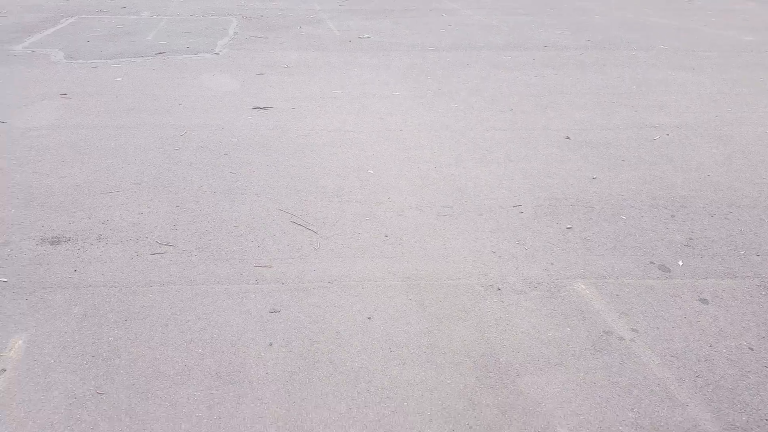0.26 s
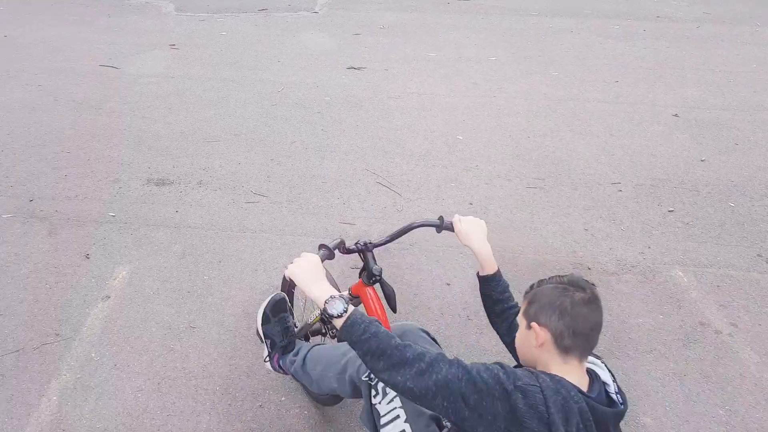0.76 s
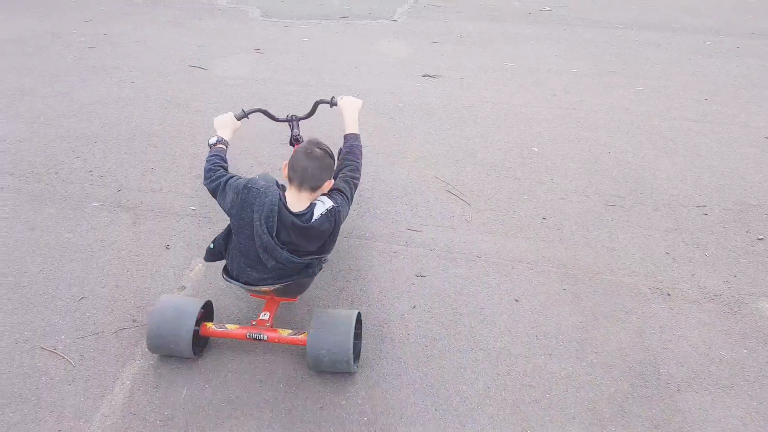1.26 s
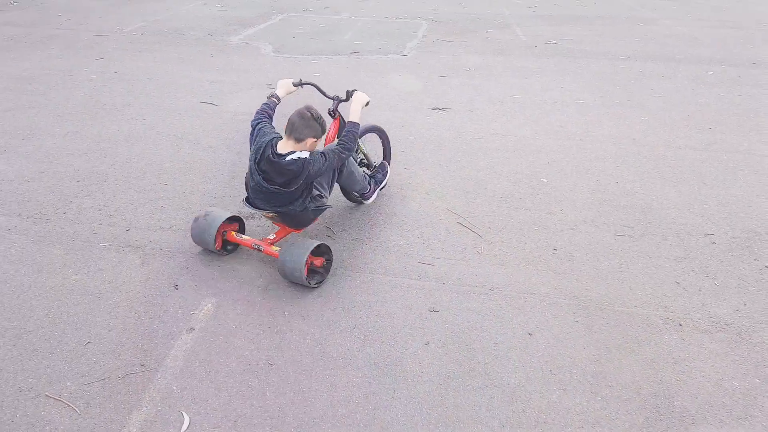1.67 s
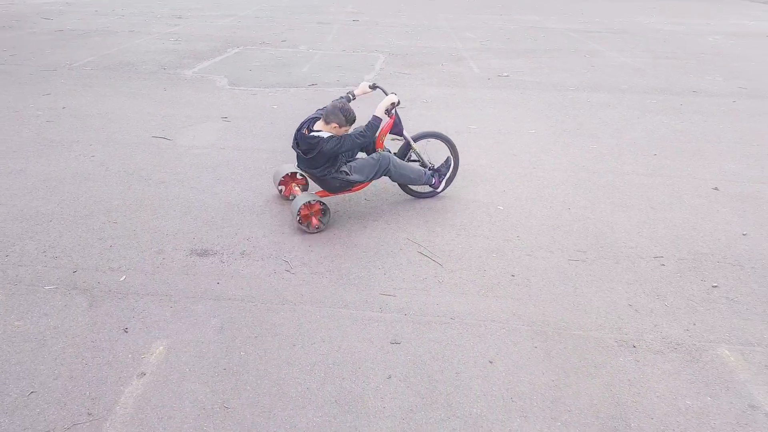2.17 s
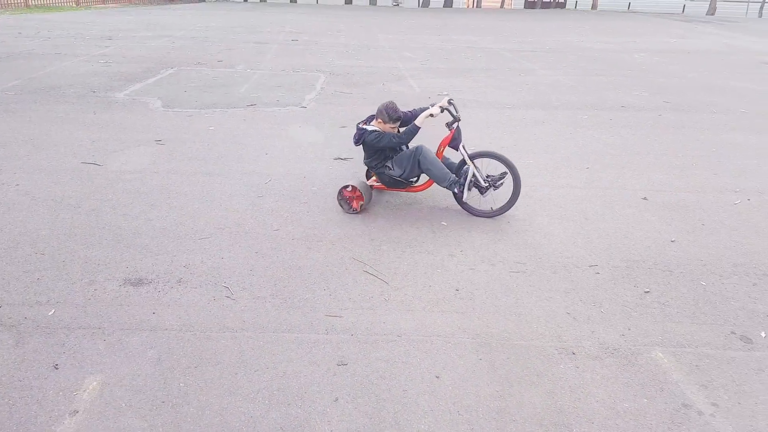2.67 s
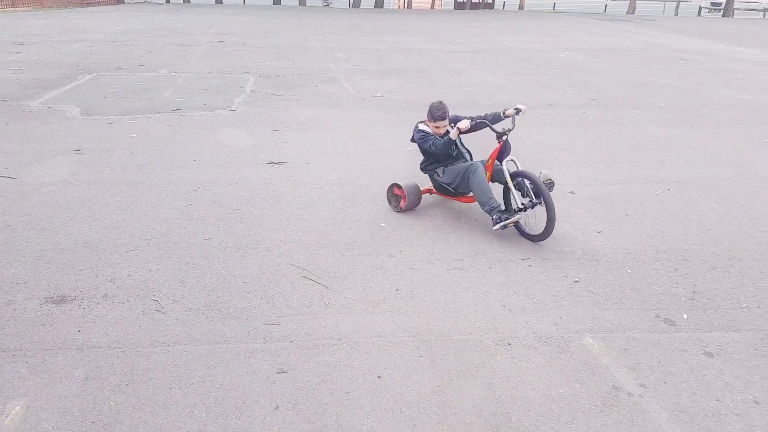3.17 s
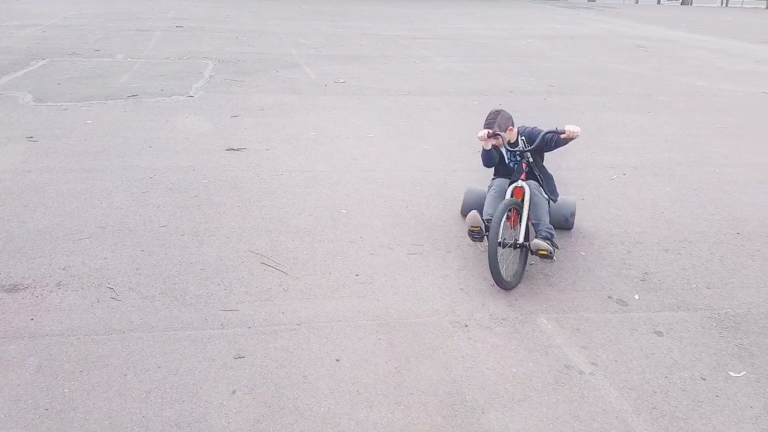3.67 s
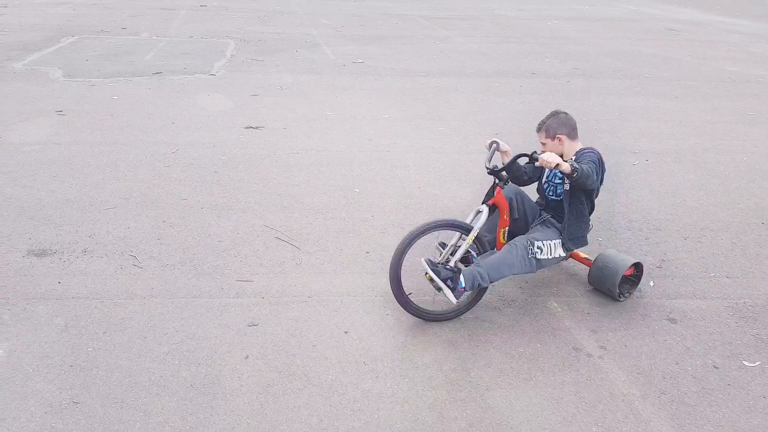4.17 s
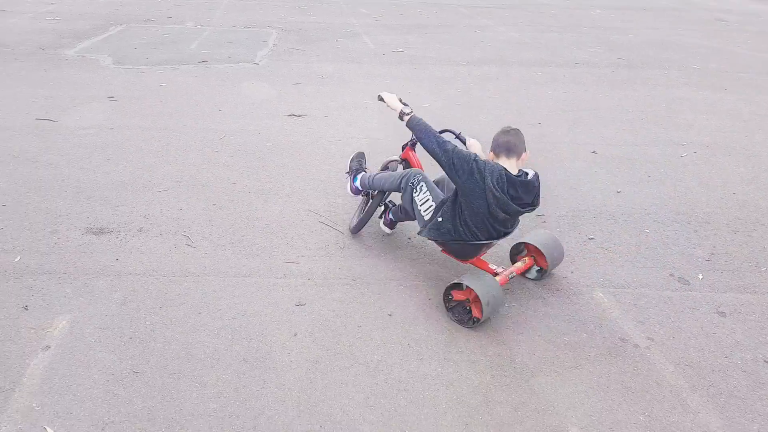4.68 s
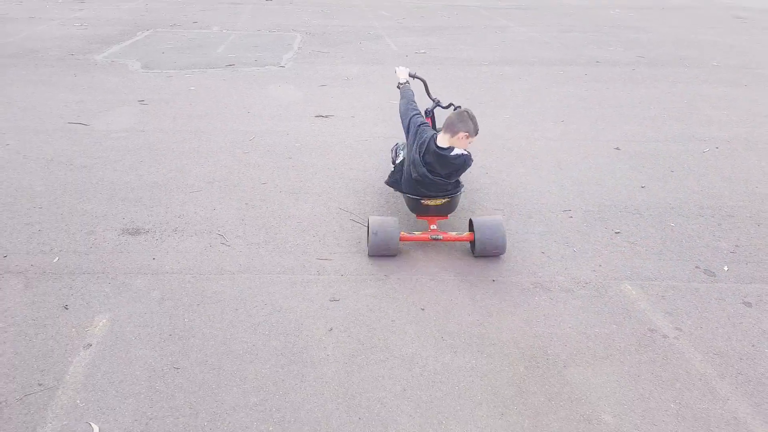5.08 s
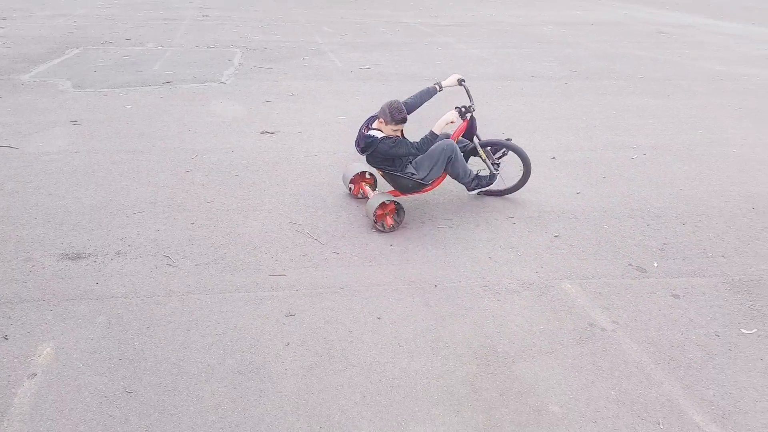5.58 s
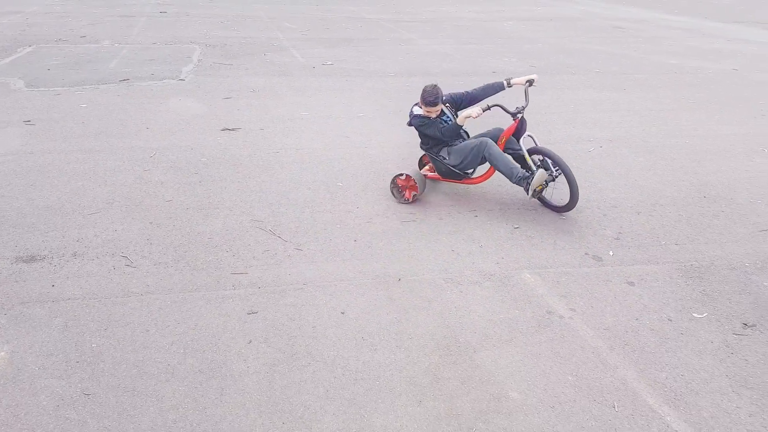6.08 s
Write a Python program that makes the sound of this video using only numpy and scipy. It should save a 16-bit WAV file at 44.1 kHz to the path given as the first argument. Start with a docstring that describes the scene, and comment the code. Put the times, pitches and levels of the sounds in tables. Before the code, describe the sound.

Close gritty grinding and sharp stone cracks on asphalt open into a hollow, ringing plastic scrape that swells and dips as a trike slides around.

```python
"""Stones crack over a close grind, then the scrape rings out: a drift trike passes and circles a car park.
Hollow plastic rear wheels grind on asphalt: shared grain impacts drive the resonances of frame, cavity,
rim and sleeve and the grit and dust bands; short bites make the grinding surge.
Stones and chippings are brief bursts of coloured noise. Heading and distance set each part's level,
an early reflection combs the sound, and low air noise rumbles separately on two microphone ports."""
import sys
import numpy as np
from scipy import signal
from scipy.fft import rfft, irfft, next_fast_len
from scipy.io import wavfile
from scipy.ndimage import uniform_filter1d, map_coordinates

SR = 44100
rng = np.random.default_rng(int(sys.argv[2]) if len(sys.argv) > 2 else 0)


def dump(signal):
    """Clip the signal to [-1, 1] and save it as 16-bit WAV at the path in sys.argv[1]."""
    limited = np.clip(np.atleast_2d(signal).T, -1, 1)
    pcm = np.round(limited * 32767).astype(np.int16)
    wavfile.write(sys.argv[1], SR, pcm)


N = 279153
TIME_S = np.arange(N) / SR

# air on the ports before its wobble: t/s, level/dB
AIR_DB = [(0, -48), (1.3, -57.5), (2.2, -52.5), (3.0, -53.5), (3.7, -46), (4.3, -51), (4.6, -35.5),
          (5.0, -42.5), (5.5, -35), (5.7, -49), (5.92, -39.5), (6.33, -53.5)]
# colour of the air rumble: f/Hz, level/dB
RUMBLE_DB = [(15, -43), (55, -3.5), (95, 0.5), (150, -1), (190, -7), (260, -7), (550, -17.5), (2000, -64)]

# course of the trike: t/s, distance/m, heading/deg (0 tail to the microphone, 90 side-on, 180 nose to it)
PATH_M_DEG = [(0, 1.64, -160), (0.6, 1.53, -91.5), (1.0, 2.66, 4), (1.5, 3, 31), (2.0, 4, 61),
              (2.65, 7.1, 119), (3.2, 3.35, 109), (3.7, 5.1, 168), (4.25, 2.6, 217), (4.6, 3.65, 251),
              (5.23, 2, 350), (5.65, 5.1, 450), (6.0, 4.9, 457), (6.33, 4.9, 498)]
# bearing: t/s, lead of the left port/ms
BEARING_MS = [(0, -0.42), (.45, -0.28), (.75, -0.12), (1.05, 0.081), (1.4, 0.12), (1.95, 0.11),
              (3.15, -0.034), (4.35, -0.17), (4.95, -0.058), (5.6, 0.00091), (6.33, 0.0021)]
# early reflection: t/s, delay/ms
ECHO_MS = [(0, 0.79), (0.55, 0.47), (1.1, 0.51), (1.65, 0.59), (1.88, 0.85), (2.15, 0.91), (2.55, 1.02),
           (3.35, 0.98), (3.75, 0.94), (4.1, 0.844), (4.65, 0.79), (5.15, 0.89), (5.85, 1.05), (6.33, 0.96)]

# larger stones caught under a wheel; levels before the common stone trim:
# t/s, level/dB, centre f/Hz, spread/octaves (before SPREAD_SCALE), contact time/s
STONES = [(0.0217, -17, 2280, 0.22, 0.0002), (0.0343, -13, 3200, 0.88, 0.00071),
          (0.059, -17.5, 3680, 0.5, 0.0015), (0.069, -14, 1510, 0.39, 0.0023),
          (0.101, -16.5, 3240, 0.51, 0.0015), (0.1515, -11.5, 2630, 0.7, 0.0011),
          (0.158, -17, 2750, 0.71, 0.0028), (0.1815, -11.5, 2720, 0.16, 0.00032),
          (0.2386, -12, 2760, 0.39, 0.00056), (0.2507, -12, 2620, 0.18, 0.0014),
          (0.3082, -12.5, 2370, 0.63, 0.0039), (0.42, -12.5, 2870, 0.31, 0.00052),
          (0.4811, -10.5, 2200, 0.72, 0.0042), (0.6173, -12.5, 3900, 0.25, 0.001),
          (0.6693, -11, 2770, 0.43, 0.00079), (0.6958, -11.5, 1940, 1.04, 0.0023),
          (0.7277, -9.5, 2200, 0.3, 0.0016), (0.9368, -13, 2390, 0.14, 0.00088),
          (0.9617, -14, 3080, 0.88, 0.0018), (0.9949, -10.5, 2800, 0.26, 0.0015),
          (1.1183, -12.5, 2400, 0.61, 0.0013), (1.3285, -20, 2720, 1.0, 0.0011),
          (1.473, -18, 2140, 0.73, 0.0015), (1.669, -14.5, 3500, 0.67, 0.0016),
          (1.7503, -9, 3220, 0.43, 0.00088), (1.901, -14, 3270, 0.5, 0.0011),
          (1.9671, -14, 1780, 0.46, 0.0036), (2.3612, -9, 2800, 0.35, 0.0031),
          (2.3939, -15.5, 1420, 0.6, 0.0013), (2.484, -13.5, 2590, 0.36, 0.0007),
          (2.5166, -13, 4800, 0.7, 0.00074), (2.6006, -16.5, 3060, 0.88, 0.0017),
          (2.6608, -13, 3000, 0.65, 0.001), (2.7497, -9, 6600, 0.99, 0.00095),
          (2.7989, -19, 3070, 0.39, 0.00088), (2.831, -14.5, 4040, 0.46, 0.00044),
          (3.067, -11, 1820, 0.7, 0.0012), (3.1437, -14, 1840, 0.75, 0.0018),
          (3.3438, -15.5, 3420, 0.51, 0.002), (3.45, -14, 2600, 0.52, 0.00093),
          (3.599, -10, 2340, 0.43, 0.0014), (3.8734, -12.5, 2780, 0.29, 0.00053),
          (3.9077, -14, 4560, 0.46, 0.003), (4.2195, -11, 2870, 0.48, 0.0049),
          (4.254, -15.5, 4700, 0.33, 0.0014), (4.3882, -8, 2140, 0.55, 0.0026),
          (4.5178, -12, 4250, 0.56, 0.0008), (4.7686, -16, 2200, 0.13, 0.0024),
          (4.7804, -15, 3240, 1.1, 0.0022), (4.843, -13, 2730, 0.77, 0.0007),
          (4.8798, -4.5, 1930, 0.21, 0.00078), (5.1256, -7.5, 2800, 0.45, 0.00046),
          (5.1538, -13, 3200, 0.86, 0.0014), (5.1697, -9, 1510, 0.78, 0.00049),
          (5.2223, -12, 1880, 0.47, 0.002), (5.278, -15, 1930, 0.5, 0.0011),
          (5.3437, -9, 2540, 0.49, 0.00056), (5.4936, -17, 2240, 0.21, 0.0013),
          (5.5743, -20.5, 2030, 0.76, 0.0025), (5.6119, -11, 2580, 0.7, 0.00074),
          (5.7893, -14.5, 5200, 0.86, 0.00071), (5.8086, -14.5, 4340, 0.97, 0.0014),
          (5.9267, -14.5, 2720, 0.51, 0.0025), (5.9763, -11, 2230, 0.42, 0.0015),
          (6.1182, -14, 2840, 0.49, 0.0011), (6.2138, -17.5, 2200, 0.59, 0.0013)]
# colour common to all stones: f/Hz, level/dB
STONE_COLOUR_DB = [(100, -11), (380, 20.5), (580, 2), (1100, 15.5), (1600, 4), (2100, 6), (3000, 0.5),
                   (5000, 4), (6000, 2.5), (7600, 6.5), (9200, -3.5), (11000, 0.5), (16000, -6)]

# steady grinding: t/s, level/dB
GRIND_DB = [(0.0, -29), (0.23, -27.5), (0.42, -22), (0.62, -18.5), (0.87, -27.5), (1.05, -27), (1.25, -27),
            (1.6, -29.5), (1.85, -20), (2.2, -25), (2.58, -23), (2.98, -28.5), (3.3, -26), (3.72, -26),
            (4.0, -25), (4.35, -28.5), (4.72, -26), (5.07, -29), (5.3, -24), (5.75, -27.5), (6.1, -31),
            (6.33, -27.5)]
# wheels bite into the asphalt: middle t/s, length at half the dB gain/s, gain/dB
BITES = [(0.474, 0.092, 4), (0.77, 0.047, 7.5), (0.952, 0.063, 9.5), (1.001, 0.028, 4.5),
         (1.084, 0.064, 5.5), (1.37, 0.055, 7.5), (1.692, 0.064, 7), (1.85, 0.036, 2), (1.97, 0.08, 1.5),
         (2.353, 0.082, 5), (2.678, 0.035, 4), (2.831, 0.026, 6), (3.07, 0.039, 7), (3.154, 0.054, 8.5),
         (3.592, 0.13, 4.5), (3.726, 0.11, 5), (3.915, 0.072, 6), (4.042, 0.036, 4), (4.282, 0.054, 5.5),
         (4.422, 0.038, 10.5), (4.542, 0.087, 9), (4.643, 0.05, 6), (4.763, 0.076, 7), (4.865, 0.11, 5.5),
         (4.988, 0.057, 6), (5.183, 0.053, 2), (5.27, 0.042, 2.5), (5.32, 0.018, 2.5), (5.39, 0.048, 8),
         (5.58, 0.017, 6.5), (5.876, 0.021, 7), (5.97, 0.076, 4), (6.25, 0.035, 2)]
# how the skid loads the sleeves: t/s, shift of their resonances/Hz, ring of their edge/dB
SKID_HZ_DB = [(0, 450, -36), (0.55, 250, -5.5), (0.8, 60, -6), (1.05, 150, -7), (1.35, -130, -7.5),
              (1.9, -130, -8), (2.4, -0.5, -13.5), (3.3, 20, -15.5), (3.7, 90, -8.5), (4.3, 70, -14.5),
              (4.8, 171, -19), (5.2, 11.5, -14.5), (6.33, 10.5, -18)]

# resonances of the frame: f/Hz, width/Hz, level/dB
FRAME_MODES = [(340, 296, -6.5), (431.6, 94, 0), (488.5, 43, -2), (710, 260, -7.5)]
# resonances of the hollow wheel: f/Hz, width/Hz, level/dB
CAVITY_MODES = [(780, 230, -11), (1098, 67, 0), (1285, 210, -8)]
# resonance of the rim: f/Hz, width/Hz, level/dB
RIM_MODES = [(1507, 135, 0)]
# resonances of the sleeves before the skid shift: f/Hz, width/Hz, level/dB
SLEEVE_MODES = [(1790, 280, -1.5), (2030, 303, 0), (2208, 168, -0.5), (3070, 156, -11)]
# resonance of the sleeve edge: f/Hz, width/Hz, level/dB
EDGE_MODES = [(3090, 960, 0)]
# colour of the grit: f/Hz, level/dB
GRIT_DB = [(150, -29), (550, -14), (900, 2), (1600, -1), (2600, 4.5), (3200, -1), (4000, -1.5), (5000, -1),
           (5900, -10.5), (7300, -25), (8200, -44.5), (9200, -30), (16000, -41)]
# colour of the dust: f/Hz, level/dB
DUST_DB = [(4000, -3), (6000, 3.5), (7300, 6), (8200, 4), (9200, -9), (10500, -3), (11300, -4.5),
           (12100, -0.5), (12900, -1), (13800, 0), (16000, -3.5)]

# radiation of each part: tail-on at REFERENCE_M/dB, more side-on/dB, more behind the rider/dB,
# more towards the right flank/dB, change per doubling of distance/dB
FRAME_BEAM_DB = (-12.5, -4, 0, 0.8, -6)
# hollow wheel, same columns
CAVITY_BEAM_DB = (-7.5, -6, 2, 0.55, -3.05)
# rim, same columns
RIM_BEAM_DB = (-13.5, 0, -5.5, -2.5, -3)
# sleeves, same columns
SLEEVE_BEAM_DB = (-4.5, -0.6, 3, -1.1, -0.6)
# grit, same columns
GRIT_BEAM_DB = (-9, 3, 1, 0, -1.3)
# dust, same columns
DUST_BEAM_DB = (-16, 2, -4.5, 0.7, 1.5)

# likeness of the two ports: f/Hz, correlation/1
PORT_LIKENESS = [(300, 0.99), (1100, 0.84), (2100, 0.68), (4000, 0.51), (8000, 0.3), (14000, 0.27)]
# port balance: f/Hz, left minus right/dB
BALANCE_DB = [(100, -3), (450, 0.8), (800, 2), (1500, 4.5), (2000, 4), (2750, 6.5), (4500, 3.5),
              (7200, 5.5), (9200, -2.5), (12000, 9), (16000, 4.5)]

REFERENCE_M = 3
SHADOW_NARROWNESS = 7  # higher: the rider hides the wheels only when facing the microphone squarely
ECHO_FALL = 0.17  # power of distance by which the reflection fades
BITE_STEEPNESS = 3.06  # abruptness of a bite's start and end
SKID_START_S, SKID_ONSET_S, ROLLING_DB = 0.67, 0.17, -7.5  # sleeves ring less until the wheels break loose
FRAME_JOLT = 0.18  # extra frame dB per dB of surge
PATCHY_DB = 1.5  # standard deviation of the scrape's colour shifts
SPREAD_SCALE, MIN_CONTACT_S, STONE_TRIM_DB = 0.98, 0.0002, -1.5
PEAK, TOP_HZ = 0.95, 16000


def amp(db):
    """Decibels to gain."""
    return 10 ** (np.asarray(db) / 20)


def unit(x):
    """Scale to rms 1."""
    return x / np.sqrt(np.mean(x ** 2) + 1e-20)


def steady(x):
    """Scale to rms 1 over a running half second."""
    power = uniform_filter1d(np.mean(x ** 2, axis=0), size=SR // 2)
    return x / np.sqrt(np.abs(power) + 1e-20)


def along(points, hz):
    """Read (Hz, value) points on a log frequency axis."""
    f, v = np.transpose(points)
    return np.interp(np.log(hz + 1), np.log(f + 1), v)


def curves(rows):
    """One value per sample for each column after the time."""
    s, *cols = np.transpose(rows)
    return [np.interp(TIME_S, s, c) for c in cols]


def wobble(rate_hz):
    """Smooth random curve with rate_hz knots a second."""
    knots = rng.standard_normal(4096)
    smooth = signal.resample_poly(knots, 8, 1)
    return smooth[(TIME_S * rate_hz * 8).astype(int) % len(smooth)]


def filtered(x, response):
    """Multiply the spectrum by a response of frequency."""
    n = x.shape[-1]
    m = next_fast_len(n)
    hz = np.fft.rfftfreq(m, 1 / SR)
    return irfft(rfft(x, m) * response(hz), m)[..., :n]


def port_noise():
    """White noise at two ports: alike in the bass, far less so in the treble."""
    m = next_fast_len(N + 4096)  # spare length for the last stones
    hz = np.fft.rfftfreq(m, 1 / SR)
    alike = along(PORT_LIKENESS, hz)
    spectra = rng.standard_normal((2, 2 * len(hz))).view(complex)
    mid, side = spectra * np.sqrt([1 + alike, 1 - alike])
    return unit(irfft(np.array([mid + side, mid - side]), m))


def air():
    """Low rumble from unrelated noise at each port."""
    rumble = filtered(rng.standard_normal((2, N)), lambda hz: amp(along(RUMBLE_DB, hz)))
    return amp(curves(AIR_DB)[0] + 1.9 * wobble(33)) * unit(rumble)


def aspect():
    """View of the trike from the microphone, one row per column of a beam."""
    distance_m, heading_deg = curves(PATH_M_DEG)
    turn = np.radians(heading_deg)
    side_on = np.sin(turn) ** 2
    hidden = np.abs(np.sin(turn / 2)) ** (2 * SHADOW_NARROWNESS)
    doublings = np.log2(distance_m / REFERENCE_M)
    return np.array([np.ones(N), side_on, hidden, np.sin(turn), doublings])


def delayed(x, samples):
    """One channel read a moving number of samples late."""
    return map_coordinates(x, [np.arange(N) - samples], order=3)


def placed(x):
    """The sound reaches the nearer port first: half the lead goes to each port."""
    half_lead = curves(BEARING_MS)[0] / 1000 * SR / 2
    return np.array([delayed(x[0], -half_lead), delayed(x[1], half_lead)])


def reflected(x, share):
    """A late copy combs the sound; its notches glide with delay and fade with distance."""
    echo_time_s = TIME_S - curves(ECHO_MS)[0] / 1000
    late = np.array([np.interp(echo_time_s, TIME_S, port) for port in x])
    gain = share * (REFERENCE_M / curves(PATH_M_DEG)[0]) ** ECHO_FALL
    return (x + gain * late) / np.sqrt(1 + gain ** 2)


def surge():
    """Gain of the bites in dB, each a rounded swell."""
    total_db = np.zeros(N)
    for middle_s, length_s, gain_db in BITES:
        offset = np.abs(2 * (TIME_S - middle_s) / length_s)
        total_db += gain_db / (1 + offset ** BITE_STEEPNESS)
    return total_db


def effort():
    """Grinding level in dB: steady scrape plus surges."""
    return curves(GRIND_DB)[0] + surge()


def crunches(rows):
    """Each stone is a noise burst of its own pitch and contact time, with a short shiver in the wheel."""
    size, lead = 2048, 128  # samples; the lead leaves silence before contact
    t = np.maximum(np.arange(size) - lead, 0) / SR
    noise = port_noise()
    out = np.zeros_like(noise)
    for s, db, pitch_hz, spread, contact_s in rows:
        start = round(s * SR)
        span = slice(start, start + size)
        u = t / max(contact_s, MIN_CONTACT_S)
        shiver = amp(-60 * t / 0.032) * (1 - np.exp(-u))  # falls 60 dB in 32 ms
        jerks_db = 2.5 * np.repeat(rng.standard_normal(size // 16), 16)  # it breaks in tiny jerks
        crunch = (u * np.exp(1 - u) + 0.087 * shiver) * amp(jerks_db)

        def colour(hz):
            """Common stone colour narrowed around this stone's pitch."""
            offset = np.log2((hz + 1) / pitch_hz) / (SPREAD_SCALE * spread)
            return amp(along(STONE_COLOUR_DB, hz)) / (1 + offset ** 2)

        hit = filtered(crunch * noise[:, span], colour)
        loudest = uniform_filter1d(np.mean(hit ** 2, axis=0), size=88).max()  # 2 ms window
        out[:, span] += amp(db) * hit / np.sqrt(loudest)
    return out[:, lead:lead + N]


def chippings(count, level_db, range_db, pitch_hz, scatter_octaves, spread, contact_s):
    """Loose chippings tick at scattered pitches, louder under harder grinding."""
    when, size, length = rng.random((count, 3)).T
    octave = scatter_octaves * np.clip(rng.standard_normal(count), -2, 2)
    force_db = effort()[(when * N).astype(int)]
    db = force_db + level_db + range_db * size ** 2 - 4 * np.abs(octave)
    contacts_s = contact_s * (.5 + length)
    return np.column_stack([when * N / SR, db, pitch_hz * 2 ** octave, np.full(count, spread), contacts_s])


def stones():
    """Single stones, chippings and sand crunch under the wheels, with a weak reflection."""
    loose = chippings(count=230, level_db=-0.8, range_db=5.0, pitch_hz=3090,
                      scatter_octaves=0.57, spread=0.34, contact_s=0.00069)
    sand = chippings(count=110, level_db=-12, range_db=10, pitch_hz=8500,
                     scatter_octaves=0.3, spread=0.64, contact_s=0.00038)
    hits = crunches(np.vstack([STONES, loose, sand]))
    return amp(STONE_TRIM_DB) * reflected(hits, share=0.18)


def contacts(rate_hz, scatter_db, life_s):
    """Power of tiny impacts of uneven size, each decaying by 1/e in life_s; mean 1."""
    when, draw = rng.random((int(rate_hz * N / SR), 2)).T
    size = np.minimum(-np.log(1 - draw), 4.2)
    blows = np.bincount((when * N).astype(int), amp(scatter_db * size) ** 2, N)
    fade = np.exp(-1 / (life_s * SR))
    power = signal.lfilter([1], [1, -fade], blows)
    return power / power.mean()


def ringing(modes):
    """Response of a few resonances of alternating sign, radiating weakly away from their mean pitch."""
    centre_hz = np.mean([hz for hz, width, db in modes])

    def band(f, hz, width):
        """Causal resonance with unit gain at its peak."""
        return 1j * f * width / (hz * hz - f * f + 1j * f * width)

    def response(f):
        """Sum of the modes under one broad band."""
        total = sum((-1) ** k * amp(db) * band(f, hz, width) for k, (hz, width, db) in enumerate(modes))
        return band(f, centre_hz, centre_hz) * total

    return response


def glided(x, shift_hz):
    """Shift all frequencies by a moving number of Hz: the ring glides with the skid."""
    analytic = signal.hilbert(x, next_fast_len(N))[:, :N]
    return np.real(analytic * np.exp(2j * np.pi * np.cumsum(shift_hz) / SR))


def patchy(x):
    """The contact patch keeps changing, so the scrape's colour shifts from moment to moment."""
    z = signal.stft(x, nperseg=256)[2]
    field = rng.standard_normal(z.shape[1:])
    field = uniform_filter1d(field, size=5, axis=0)
    field = uniform_filter1d(field, size=7, axis=1)
    mean_power_db = PATCHY_DB ** 2 * np.log(10) / 20  # taken off to hold the mean power
    gain = amp(PATCHY_DB * unit(field) - mean_power_db)
    return signal.istft(z * gain, nperseg=256)[1][:, :N]


def grinding():
    """Asphalt grains strike the sleeves; shared impacts drive every part. Returns frame and wheels."""
    chatter_db = 1.74 * wobble(55)  # the wheels skip over the coarse surface
    force_db = effort() + chatter_db
    beams = np.array([FRAME_BEAM_DB, CAVITY_BEAM_DB, RIM_BEAM_DB,
                      SLEEVE_BEAM_DB, GRIT_BEAM_DB, DUST_BEAM_DB])
    frame_db, cavity_db, rim_db, sleeve_db, grit_db, dust_db = beams @ aspect()
    rolling = np.clip(.5 - (TIME_S - SKID_START_S) / SKID_ONSET_S, 0, 1)
    shift_hz, edge_db = curves(SKID_HZ_DB)
    shared = contacts(rate_hz=600, scatter_db=2.5, life_s=0.0014)

    def part(response, level_db, bounce, grainy=0.82, own=0.35):
        """Impacts over smooth rubbing, heard through one part's response."""
        own_impacts = contacts(rate_hz=530, scatter_db=6.0, life_s=0.00094)
        impacts = (1 - own) * shared + own * own_impacts
        drive = np.sqrt(1 - grainy + grainy * impacts) * port_noise()[:, :N]
        sound = reflected(filtered(drive, response), bounce)
        return amp(force_db + level_db) * steady(sound)

    frame = part(ringing(FRAME_MODES), frame_db + FRAME_JOLT * surge(), bounce=0.63, grainy=0.78)
    cavity = part(ringing(CAVITY_MODES), cavity_db, bounce=0.11)
    rim = part(ringing(RIM_MODES), rim_db, bounce=0.68)
    sleeve = part(ringing(SLEEVE_MODES), sleeve_db + ROLLING_DB * rolling, bounce=0.38)
    sleeve = glided(sleeve, shift_hz)
    edge = part(ringing(EDGE_MODES), edge_db, bounce=0.18)
    grit = part(lambda hz: amp(along(GRIT_DB, hz)), grit_db, bounce=0.27, own=0.38)
    dust = part(lambda hz: amp(along(DUST_DB, hz)), dust_db, bounce=0.044, grainy=0.96, own=0.43)
    return frame, cavity + rim + patchy(sleeve + edge + grit) + dust


def scene():
    """Grinding and stones travel with the trike; the air stays at the microphone."""
    frame, wheels = grinding()
    return frame + placed(wheels + stones()) + air()  # the long frame has no clear bearing


def record(dry):
    """The ports differ in sensitivity over frequency; peaks are rounded off, then the band is limited."""
    def ports(hz):
        """Gain of each port, with unit mean power across the two."""
        balance_db = along(BALANCE_DB, hz)
        gains = amp(np.array([balance_db, -balance_db]) / 2)
        return gains / np.sqrt(np.mean(gains ** 2, axis=0))

    x = filtered(dry, ports)
    x = x / (1 + np.abs(x / PEAK) ** 6) ** (1 / 6)
    return filtered(x, lambda hz: hz < TOP_HZ)


dry = scene()
out = record(dry)
dump(out)
```